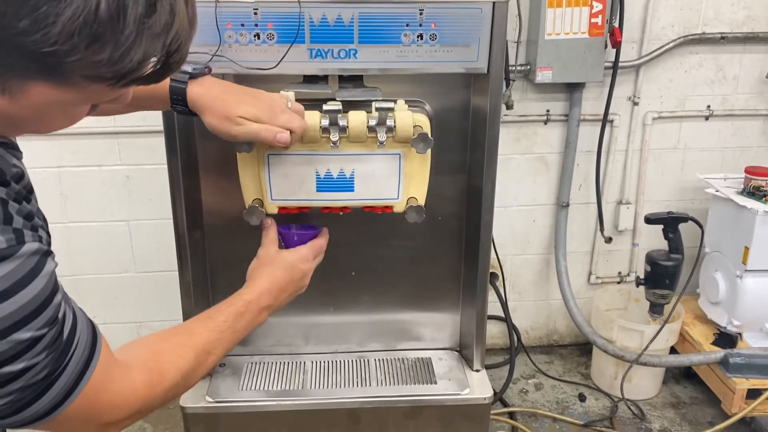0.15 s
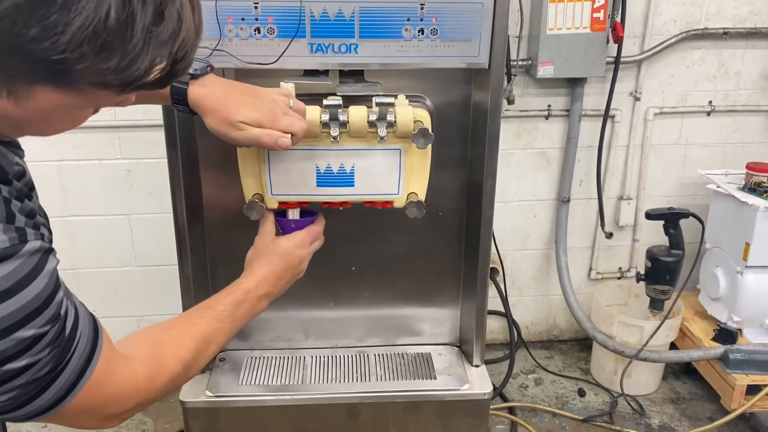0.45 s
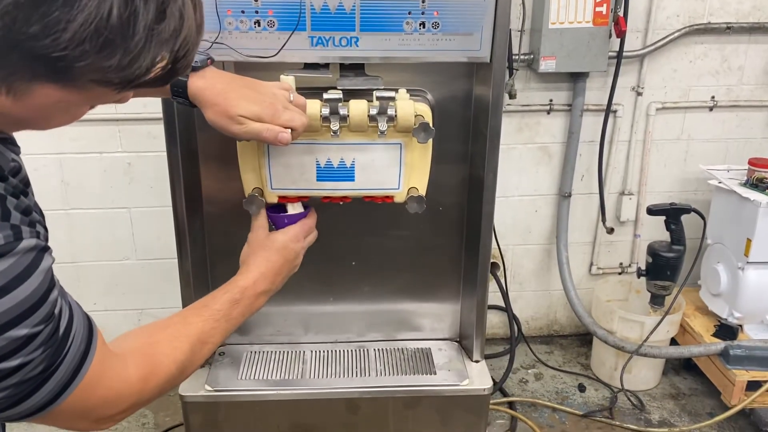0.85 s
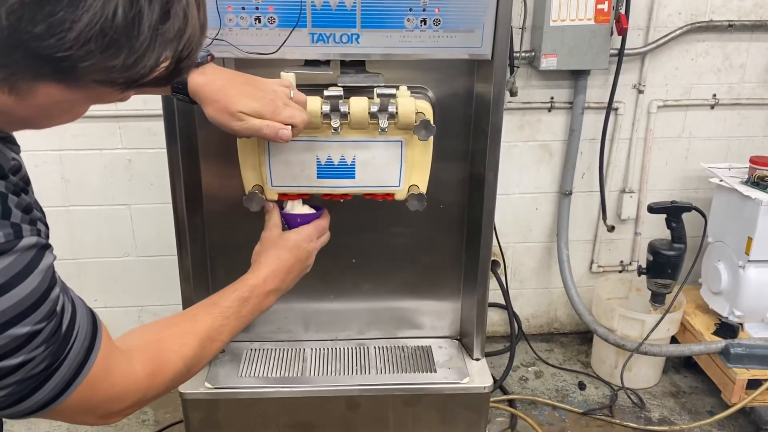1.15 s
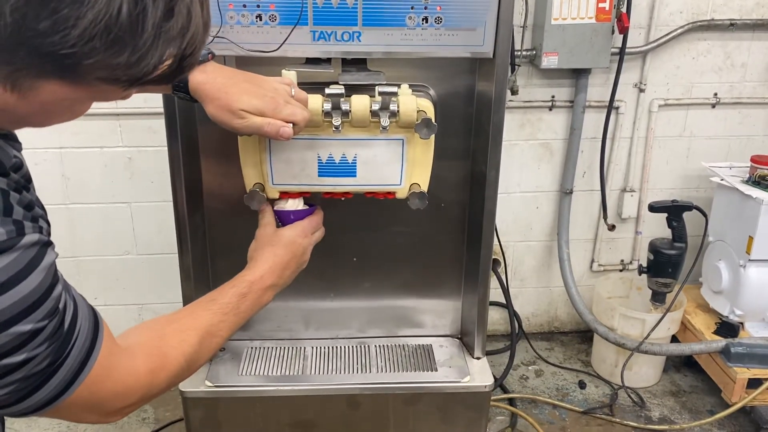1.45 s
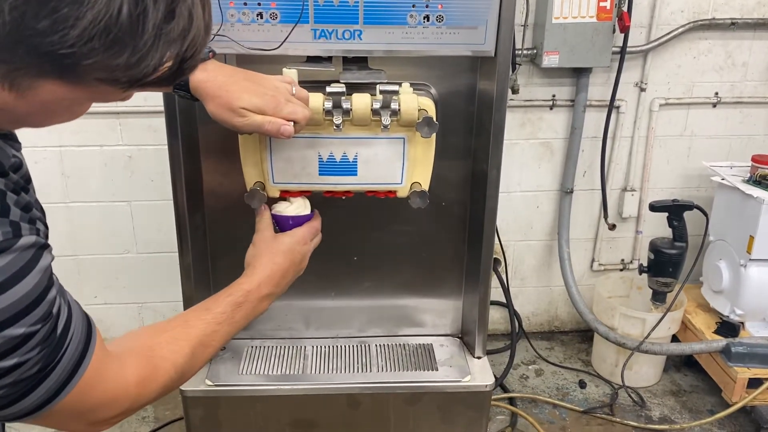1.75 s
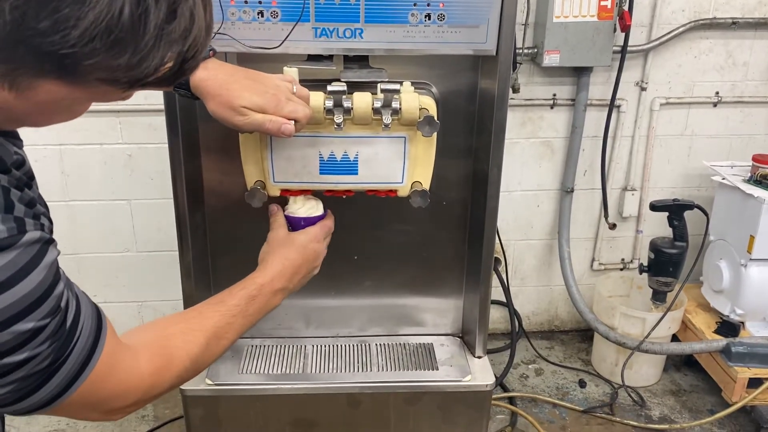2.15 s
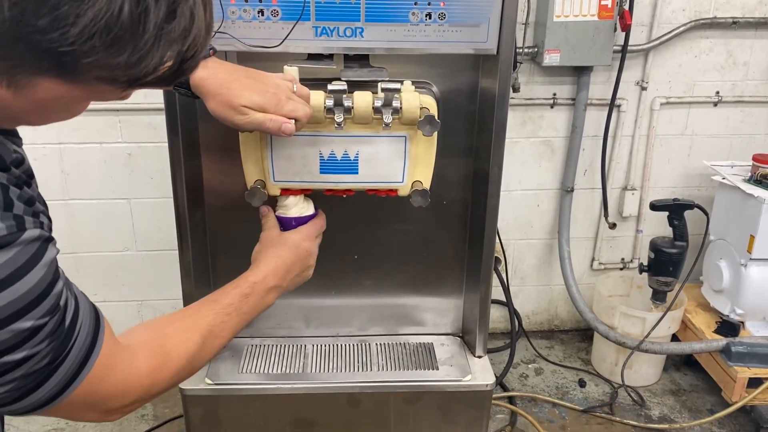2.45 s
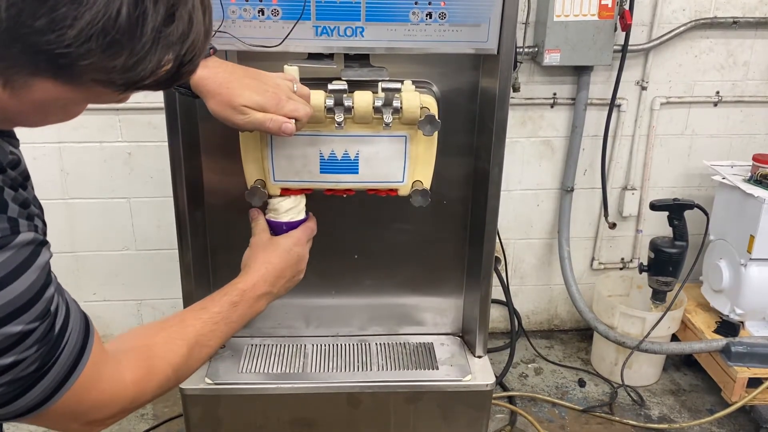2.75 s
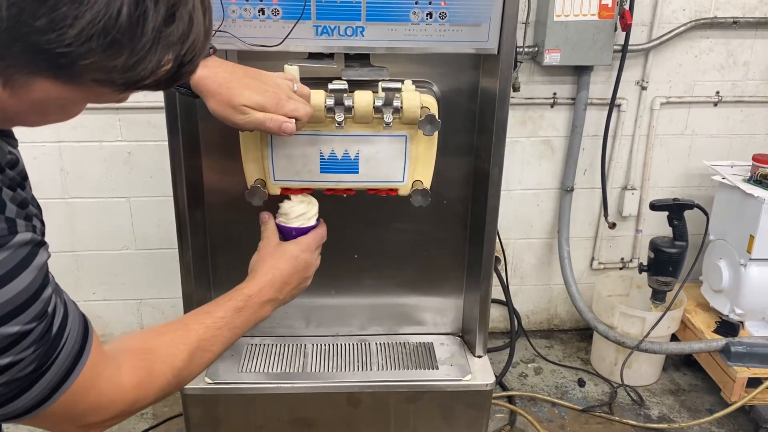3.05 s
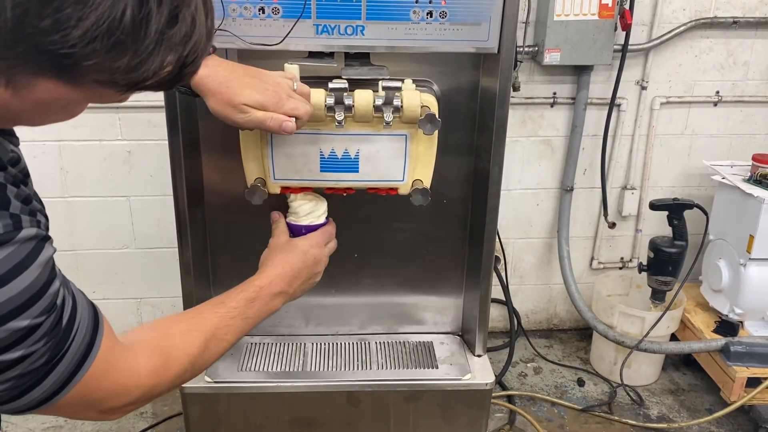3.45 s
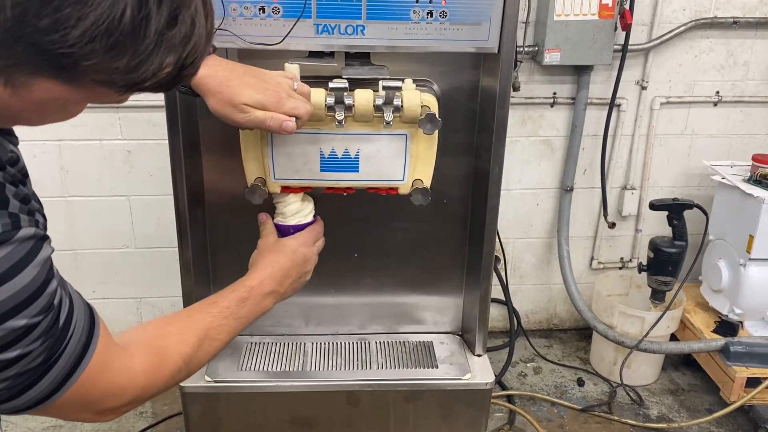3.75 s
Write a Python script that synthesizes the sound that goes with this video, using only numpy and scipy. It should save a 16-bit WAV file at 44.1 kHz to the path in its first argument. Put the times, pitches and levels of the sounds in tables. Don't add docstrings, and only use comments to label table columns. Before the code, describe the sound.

Soft ice cream freezer running: a brief low fan rumble, a hard double clack with rattling steel, then a steady mid-pitched motor whine with airy hiss until the end, close microphone, short workshop reverberation.

```python
import sys
import numpy as np
from scipy import signal
from scipy.fft import rfft, irfft, next_fast_len
from scipy.io import wavfile
from scipy.ndimage import uniform_filter1d, map_coordinates

SR = 44100
rng = np.random.default_rng(int(sys.argv[2]) if len(sys.argv) > 2 else 0)


def gain_from_db(level_db):
    decades = np.asarray(level_db, float) / 20
    return 10 ** decades


def inscribe(sig):
    pcm = np.round(np.clip(np.atleast_2d(sig).T, -1, 1) * 32767)
    wavfile.write(sys.argv[1], SR, pcm.astype(np.int16))


N = 171990

# f/Hz, coherence
COHERENCE = [(60, 0.99), (200, 0.96), (400, 0.76), (800, 0.27), (2500, 0.37), (5000, 0.31),
             (6500, .55), (7700, .62), (8400, .76), (8900, .62), (9800, .996)]

# f/Hz, level/dB per Hz
RUMBLE = [(30, -45), (45, -17), (70, -8.5), (140, -4), (200, -11), (500, -12.5), (1500, -20), (9000, -43)]
# f/Hz, width/Hz, level/dB
DUCT = [(62, 2.6, 3.5), (72, 15, 6.9), (129, 26.3, 10.9), (143, 10, 4.3), (234, 13, 14.2)]
RUMBLE_DB, RUMBLE_PATCH_DB = -33.5, 0.3
HUM_HZ, HUM_DB = 58.3, -48

# t/s, peak level/dB, rise/s, t60/s
RATTLE = [
    (.056, -30, 0.0011, .3),
    (0.0668, -14.5, 0.0021, 0.19),
    (0.17, -28.5, 0.018, 0.49),
    (0.14, -28, 0.031, 0.3),
]
# f/Hz, level/dB per Hz
RATTLE_COLOUR = [(100, -26), (250, -5.5), (500, 6.5), (900, 1), (2500, -3), (6000, -6), (10500, -7),
                 (15000, -14.5)]
RATTLE_GRAIN_DB, RATTLE_PATCH_DB, RATTLE_FROM_S = -0.5, 3.2, .054

# t/s, f/Hz
SHAFT_SPEED = [(0.15, 55.2), (0.19, 57.6), (0.27, 58.08), (0.6, 58.18), (0.9, 58.22), (1.2, 58.25),
               (1.6, 58.31), (2, 58.36), (2.4, 58.33), (2.8, 58.38), (3.2, 58.41), (3.6, 58.39),
               (3.9, 58.42)]
START_S, GAS_RISE_S, WHINE_RISE_S = 0.063, 0.061, 0.13
# f/Hz, level/dB per Hz
GAS = [(300, -1.5), (1300, 0.5), (2000, -2), (2900, -5), (3600, -8.5), (7000, -10.5), (10000, -12.5),
       (11300, -16), (12500, -31), (13250, -16), (14000, -13.5), (15700, -16)]
GAS_DB, GAS_PATCH_DB, GAS_FLUTTER_DB = -38.5, 1.3, 0.3
GAS_GATE = 0.15
SURGE_DB, SURGE_S = 5, 0.47
# order, rms level/dB at mid load, then dB per load, load squared, load cubed
STRONG = [(13.0, -43.0, 3.3, -0.1, -8.1), (14.0, -51.3, -2.4, 2.6, -1.0), (15.0, -34.5, 5.0, -1.2, 0.2),
          (16.0, -34.1, -3.4, -7.7, 8.9), (17.0, -38.6, -6.7, -6.0, 5.1), (18.0, -47.0, 4.1, -2.9, -5.4),
          (19.0, -42.4, -10.5, -4.8, 2.2), (21.0, -52.6, -12.4, 1.6, 11.7), (23.0, -52.3, 0.4, 1.0, -2.8),
          (25.0, -45.0, 0.3, 0.0, -0.6), (26.0, -49.8, -12.3, 9.2, 10.9), (28.0, -49.4, -8.2, -4.2, 13.4),
          (31.0, -50.9, 6.5, -0.8, -3.5), (32.0, -54.5, -17.3, 2.1, 16.5), (33.0, -51.8, -4.6, -0.6, 7.0),
          (34.0, -47.5, 4.1, -2.8, -0.5), (35.0, -40.7, 6.5, -3.4, -4.7), (36.0, -50.1, -0.9, -0.7, -3.1),
          (39.0, -51.5, 0.4, -1.4, 1.0), (41.0, -48.4, 1.7, -6.9, -9.1), (45.0, -49.4, -6.6, -1.1, 11.6),
          (46.0, -46.6, 2.0, -10.9, -4.7), (47.0, -40.6, -4.3, -10.3, 12.0),
          (49.0, -52.3, -16.7, -6.4, 13.9)]
# left minus right/dB, left lead/rad, lead change/rad per load
STRONG_PLACE = [(-1.5, 2.4, 0.1), (0.6, -3.1, 1.9), (0.1, -0.3, -0.3), (-2.8, 0.6, 0.5), (-4.9, 0.7, 0.5),
                (-4.1, 1.3, -2.3), (4.4, -0.9, 1.9), (4.7, -1.8, 1.5), (-8.3, 0.4, 2.1), (5.9, -0.5, -1.2),
                (-7.3, 0.9, 1.8), (3.8, -0.2, 0.1), (1.5, -0.6, -0.7), (-2.8, 0.7, 0.9), (-3.2, -1.9, -2.2),
                (1.1, -3.1, -2.5), (-0.0, 0.3, -0.3), (1.9, 1.9, -3.3), (0.1, 0.5, -0.3), (-1.9, 0.0, 0.2),
                (1.4, 1.6, 0.1), (-0.6, 1.2, 0.4), (-3.3, 0.7, -0.7), (-2.3, 0.8, 0.2)]
# order, rms level/dB at mid load, then dB per load, load squared
MIDDLING = [(30.0, -52.1, 3.3, -3.7), (40.0, -51.5, 2.2, -10.4), (48.0, -50, 4.5, -4.5),
            (53.0, -53.2, 2.2, -5.0), (54.0, -55.6, -0.7, 4.2), (64.0, -54.8, -2.4, -12.3),
            (69.0, -55.6, -0.9, -1.8), (70.0, -51.4, 1.3, -5.7), (73.0, -56.1, 0.0, -5.5),
            (74.0, -57.8, 1.4, 4.1), (76.0, -56.8, -4.3, -5.8), (77.0, -55.4, -4.6, -4.6),
            (81.0, -50.5, -1.2, 1.2), (86.0, -55.2, -4.4, -8.6)]
# f/Hz, rms level/dB
FAINT = [(58, -88), (250, -57.5), (600, -58.5), (2500, -61.5), (3300, -63), (4700, -58), (5600, -66.5),
         (12000, -75)]
# order, t/s, half width/s, level/dB
SWELLS = [(12, 1.8, 1, -14.0), (13, 0.9, 0.25, -8.0), (15, 0.35, 0.18, 6.0), (15, 2.45, 0.25, 2.0),
          (17, 0.7, 0.25, -4.0), (20, 0.5, 1, 9.0), (24, 0.95, 0.25, -14.0), (25, 1.05, 0.18, -9.0),
          (26, 2.25, 1, -4.0), (27, 1.7, 0.5, 14.0), (28, 0.75, 0.25, -8.0), (32, 1.85, 0.35, -10.0),
          (33, 0.9, 0.18, -14.0), (35, 2.75, 0.12, 4.0), (37, 0.65, 0.18, 16.0), (37, 1.9, 0.5, 15.0),
          (40, 0.9, 0.5, -13.0), (40, 2.85, 0.35, -9.0), (41, 1.4, 0.35, -9.0), (41, 3.05, 0.25, -13.0),
          (42, 0.95, 0.7, 9.0), (44, 0.5, 0.7, -14.0), (48, 1.05, 0.25, -13.0), (50, 3.0, 1, -14.0),
          (53, 1.4, 0.5, -7.0), (54, 0.35, 0.25, -12.0), (56, 3.7, 0.25, 13.0), (57, 1.65, 0.7, 8.0),
          (61, 3.0, 1, -14.0), (66, 3.45, 0.25, -14.0), (67, 2.7, 0.7, -11.0), (72, 1.3, 1, -9.0),
          (74, 1.3, 1, -10.0), (75, 3.35, 1, -14.0), (76, 1.1, 1, -7.0), (80, 1.8, 1, -10.0),
          (81, 0.45, 0.25, -13.0), (81, 2.6, 0.7, -7.0), (84, 3.3, 0.25, -14.0), (86, 0.5, 0.25, -12.0),
          (86, 2.15, 1, -6.0), (87, 0.9, 1, -8.0), (87, 3.25, 0.5, -14.0), (90, 1.2, 1, -11.0),
          (93, 2.5, 1, -14.0), (94, 2.35, 1, -14.0)]
# order, level/dB before
VALVE = [(13, 1), (15, -3), (16, -1.5), (47, -2)]
VALVE_S = 1.05
LOAD_MID_S, LOAD_SPAN_S = 2.1, 1.8
TREBLE_ORDER = 95
FAINT_SCATTER_DB, EVEN_SCATTER_DB = 5, 2
FAINT_DRIFT_DB, MIDDLING_DRIFT_DB, STRONG_DRIFT_DB = 3.5, 1.5, .7
FAINT_PAN_DB, LEAD_DRIFT = 5.5, 0.51
DRIFT_PER_S, PHASE_DRIFT_RAD, STROKE_SMEAR_RAD = 4, .6, .02
WHINE_EARLY_DB, WHINE_EARLY_S = 0.5, 1

# t/s, rms level/dB
SCRAPE = [
    (.45, -44),
    (1.1, -43),
    (1.9, -47),
    (2.6, -44.5),
    (2.75, -52),
    (3.9, -47),
]
SCRAPE_HZ, SCRAPE_WIDTH_HZ, SCRAPE_DB, SCRAPE_PATCH_DB = 4670, 460, -7, 1.5

# t/s, panel thump level/dB, steel ring level/dB
BLOWS = [
    (.0715, -12.8, -17),
    (.0897, -19.7, -30),
    (.183, -19, -39),
    (.226, -24, -33),
]
# f/Hz, level/dB, t60/s
PANEL = [(251, 0, .9), (269, 0, .41), (517, -7, .25), (380, -16, .15)]
# f/Hz, level/dB, t60/s
STEEL = [(609.4, -9, 0.2), (790, -4, 0.25), (1473, 1.5, 0.049), (1880, -11, 0.032), (2354, -5, 0.098),
         (3980, -11, .12), (4670, -14, 0.1)]
DAMP_S, DAMP_DB, DAMP_FADE_S, DAMP_T60_S = .137, -11, 0.0016, .15
CRACK_DB, CRACK_T60_S, CRACK_HZ = 4.5, 0.016, 5030
# t/s, peak level/dB
TICKS = [
    (0.0729, -12),
    (0.0728, -26),
    (0.0778, -17),
    (0.0793, -4),
    (0.1555, -13),
]
TICK_S = .0001

# f/Hz, t60/s
ROOM = [(200, 0.57), (6000, 0.23)]
ROOM_DB = -14
PORT_FROM_HZ, PORT_CYCLE_HZ, TOP_HZ, LOW_CUT_HZ = 6500, 3750, 15700, 34


def unit(x):
    return x / np.sqrt(np.mean(x ** 2) + 1e-20)


def along(points, hz):
    f, v = np.transpose(points)
    return np.interp(np.log(hz + 1), np.log(f + 1), v)


def coherence(hz):
    return along(COHERENCE, hz)


def wobble(rate):
    return map_coordinates(rng.standard_normal(N // 20), [np.arange(N) * rate / SR])


def filtered(x, response):
    m = next_fast_len(N + 8192)
    return irfft(rfft(x, m) * response(np.fft.rfftfreq(m, 1 / SR)), m)[..., :N]


def turbulence(gain, patchy_db):
    z = signal.stft(rng.standard_normal((2, N)), nperseg=512)[2]
    field = uniform_filter1d(rng.standard_normal(z.shape[1:]), size=5, axis=0)
    field = uniform_filter1d(field, size=16, axis=1)
    pair = signal.istft(z * gain_from_db(patchy_db * unit(field)), nperseg=512)[1][:, :N]

    def mid_side_gain(hz):
        angle = np.arccos(np.clip(coherence(hz), -1, 1)) / 2
        return gain(hz) * [np.cos(angle), np.sin(angle)]

    mid, side = filtered(pair, mid_side_gain)
    return unit(np.array([mid + side, mid - side]))


def fans():
    def gain(hz):
        peaks = 1 + sum((gain_from_db(db) - 1) / (1 + (2 * (hz - c) / w) ** 2) for c, w, db in DUCT)
        return gain_from_db(along(RUMBLE, hz)) * peaks

    tone = np.sqrt(2) * np.sin(2 * np.pi * HUM_HZ * np.arange(N) / SR)
    hum = gain_from_db(HUM_DB + wobble(1.94)) * tone
    return gain_from_db(RUMBLE_DB) * turbulence(gain, RUMBLE_PATCH_DB) + hum


def rattle():
    t = np.arange(N) / SR
    swell = np.zeros(N)
    for s, db, rise, t60 in RATTLE:
        growth = np.exp(np.minimum(t - s, 0) / rise)
        decay = gain_from_db(-60 * np.maximum(t - s, 0) / t60)
        swell += gain_from_db(db) * np.where(t < s, growth, decay) * (t > RATTLE_FROM_S)
    grain = gain_from_db(RATTLE_GRAIN_DB * wobble(276))
    return swell * unit(grain * turbulence(lambda hz: gain_from_db(along(RATTLE_COLOUR, hz)), RATTLE_PATCH_DB))


def started(rise_s):
    return 1 - np.exp(-(np.clip(np.arange(N) / SR - START_S, 0, None) / rise_s) ** 2)


def gas_rush(turns):
    pulse = 1 + GAS_GATE * np.cos(2 * np.pi * turns)
    gas = unit(pulse * turbulence(lambda hz: gain_from_db(along(GAS, hz)), GAS_PATCH_DB))
    gas = gas * gain_from_db(GAS_DB + GAS_FLUTTER_DB * wobble(5.8))
    return started(GAS_RISE_S) * gas * gain_from_db(SURGE_DB * np.exp(-np.arange(N) / SR / SURGE_S))


def shaft_whine(turns, count=230, size=8192, knot_count=40):
    t = np.arange(N) / SR
    knots, k = np.linspace(0, N / SR, knot_count), np.arange(count)[:, None]
    load = np.clip((knots - LOAD_MID_S) / LOAD_SPAN_S, -1, 1)

    def drift():
        where = np.broadcast_arrays(k, knots * DRIFT_PER_S)
        return map_coordinates(rng.standard_normal((count, 64)), where)

    scatter, pan, lead, step = rng.standard_normal((4, count, 1))
    chance = drift()
    hz = k * SHAFT_SPEED[-1][1]
    scatter_db = np.where(k > TREBLE_ORDER, FAINT_SCATTER_DB, EVEN_SCATTER_DB) * scatter
    db = along(FAINT, hz) + scatter_db + FAINT_DRIFT_DB * chance
    spread = (k > 8) * (1 - coherence(hz))
    pan_db = 2 * FAINT_PAN_DB * pan * spread
    lead = 3.2 * spread * (lead + LEAD_DRIFT * drift())

    for n, *law in MIDDLING:
        db[round(n)] = np.polyval(law[::-1], load) + MIDDLING_DRIFT_DB * chance[round(n)]
    for (n, *law), (side_db, lead_rad, lead_per_load) in zip(STRONG, STRONG_PLACE):
        db[round(n)] = np.polyval(law[::-1], load) + STRONG_DRIFT_DB * chance[round(n)]
        pan_db[round(n)] = side_db
        lead[round(n)] = lead_rad + lead_per_load * load
    for n, s, width, swell_db in SWELLS:
        db[round(n)] += swell_db * np.exp(-((knots - s) / width) ** 2)
    for n, held_db in VALVE:
        db[round(n)] += held_db * (knots < VALVE_S)

    phase = np.cumsum(np.cumsum(STROKE_SMEAR_RAD * k * step, 0), 0)
    phase = phase + PHASE_DRIFT_RAD * drift() * k / 60
    where = [t / knots[1], (turns % 1) * size]
    whine = []
    for side in (.5, -.5):
        lines = gain_from_db(db + side * pan_db) * np.exp(1j * (phase + side * lead)) * (k > 0)
        cycle = irfft(lines.T, size) * size / np.sqrt(2)
        cycle = np.pad(cycle, ((0, 0), (0, 1)), "wrap")
        whine.append(map_coordinates(cycle, where, order=1, mode="nearest"))
    early = gain_from_db(WHINE_EARLY_DB * np.exp(-(t / WHINE_EARLY_S) ** 2))
    return started(WHINE_RISE_S) * np.array(whine) * early


def compressor():
    turns = np.cumsum(np.interp(np.arange(N) / SR, *np.transpose(SHAFT_SPEED))) / SR
    return shaft_whine(turns) + gas_rush(turns)


def scraper():
    db = np.interp(np.arange(N) / SR, *np.transpose(SCRAPE))
    hiss = turbulence(lambda hz: 1 / (1 + (2 * (hz - SCRAPE_HZ) / SCRAPE_WIDTH_HZ) ** 2), SCRAPE_PATCH_DB)
    return started(WHINE_RISE_S) * gain_from_db(db + SCRAPE_DB) * hiss


def ring(modes, t, scatter_db):
    out = np.zeros(len(t))
    for hz, db, t60 in modes:
        out += gain_from_db(db + scatter_db * rng.standard_normal() - 60 * t / t60) * np.sin(2 * np.pi * hz * t)
    return out


def clack():
    out, t = np.zeros(N), np.arange(SR // 2) / SR
    for s, thump_db, steel_db in BLOWS:
        seated = np.clip(s + t - max(s, DAMP_S), 0, None)
        damp = gain_from_db(DAMP_DB * (s < DAMP_S) * np.clip(seated / DAMP_FADE_S, 0, 1) - 60 * seated / DAMP_T60_S)
        noise = signal.lfilter(*signal.butter(1, CRACK_HZ, fs=SR), rng.standard_normal(len(t)))
        crack = gain_from_db(CRACK_DB - 60 * t / CRACK_T60_S) * noise
        panel = ring(PANEL, t, 0) * (1 - np.exp(-t / 0.0015)) * damp
        steel = ring(STEEL, t, 0.95) + crack
        out[round(s * SR):][:len(t)] += gain_from_db(thump_db) * panel + gain_from_db(steel_db) * steel
    return out


def ticks():
    out, u = np.zeros(N), np.arange(SR // 200) / SR / TICK_S
    for s, db in TICKS:
        out[round(s * SR):][:len(u)] += gain_from_db(db) * (1 - u / 2) * np.exp(-u / 2)
    return out


def room(x):
    hz, t, z = signal.stft(rng.standard_normal((2, SR // 2)), SR, nperseg=256)
    tail = signal.istft(z * gain_from_db(-60 * t / along(ROOM, hz)[:, None]), SR, nperseg=256)[1]
    tail = tail / np.linalg.norm(tail[0])
    delayed = np.pad(x, (300, 0))[None]
    return signal.fftconvolve(delayed, tail, axes=1)[:, :N]


def scene():
    hit = clack() + ticks()
    direct = hit * gain_from_db([[-.3], [.3]])
    return direct + gain_from_db(ROOM_DB) * room(hit) + rattle() + compressor() + fans() + scraper()


def roll_off(x):
    return signal.sosfilt(signal.butter(12, 16080, fs=SR, output="sos"), x)


def record(dry):
    def ports(hz):
        lead = np.pi * np.clip(hz - PORT_FROM_HZ, 0, None) / PORT_CYCLE_HZ
        band = (hz < TOP_HZ) / (1 + (LOW_CUT_HZ / (hz + 1)) ** 6)
        return band * np.exp([1j * lead, -1j * lead])

    return roll_off(filtered(dry, ports))


dry = scene()
out = record(dry)
inscribe(out)
```